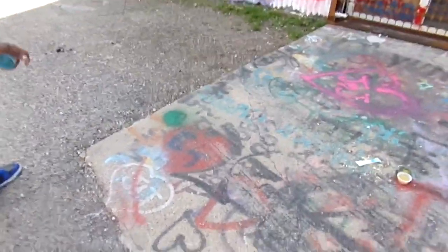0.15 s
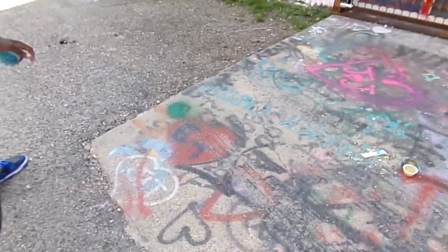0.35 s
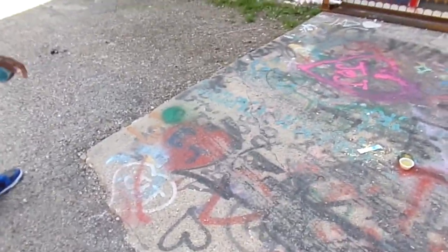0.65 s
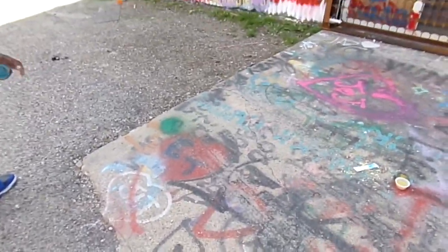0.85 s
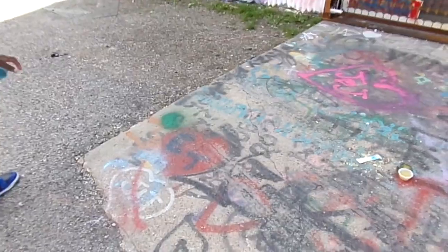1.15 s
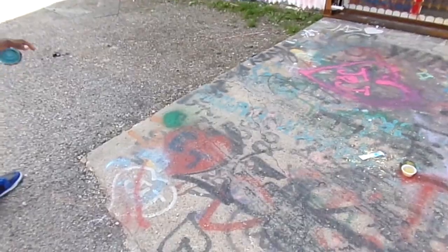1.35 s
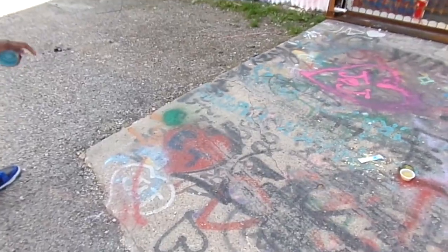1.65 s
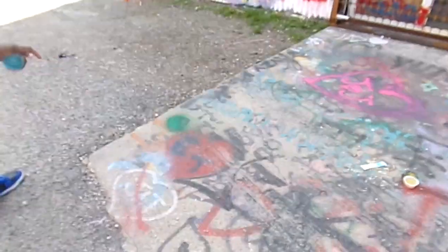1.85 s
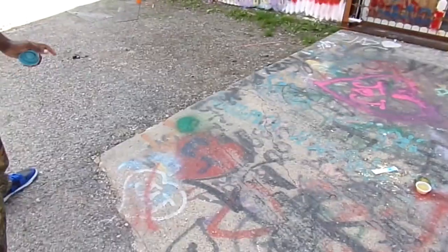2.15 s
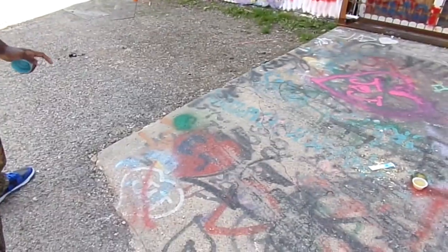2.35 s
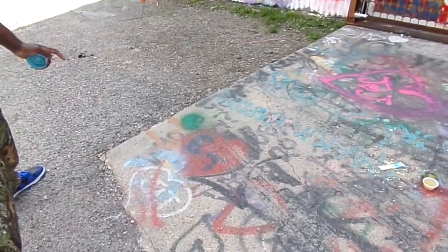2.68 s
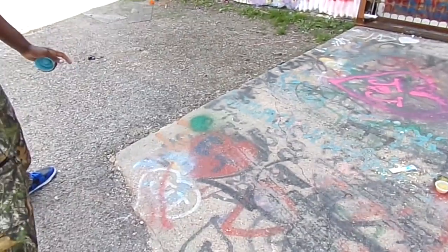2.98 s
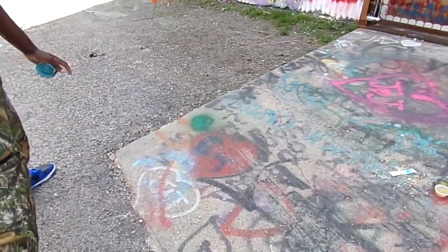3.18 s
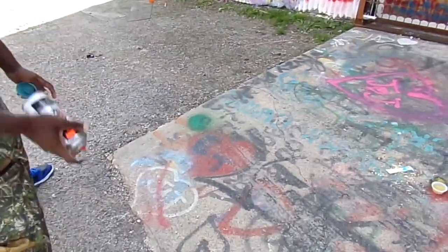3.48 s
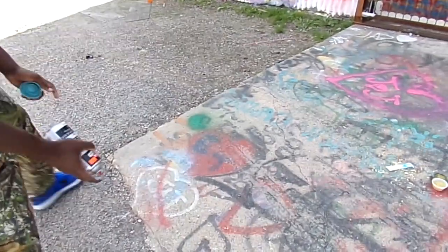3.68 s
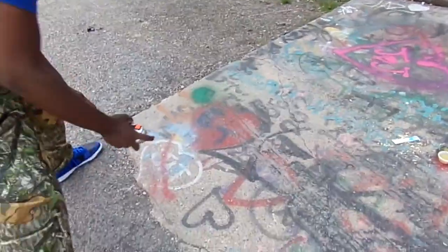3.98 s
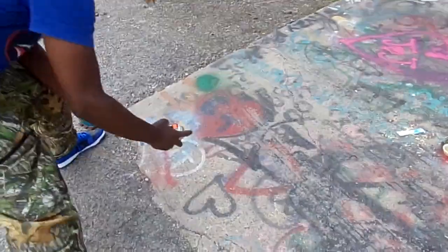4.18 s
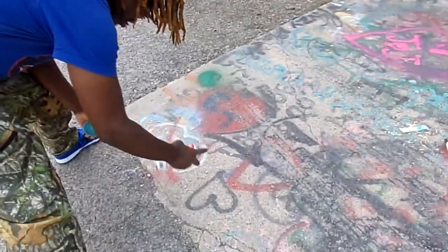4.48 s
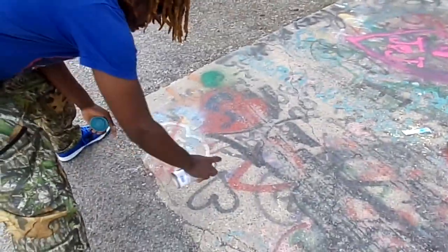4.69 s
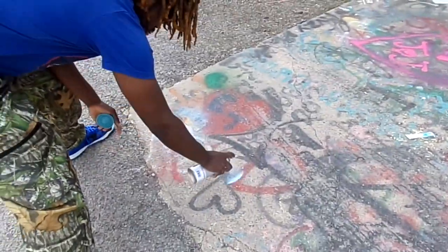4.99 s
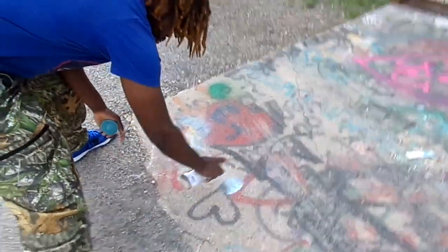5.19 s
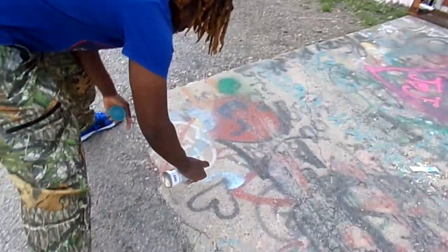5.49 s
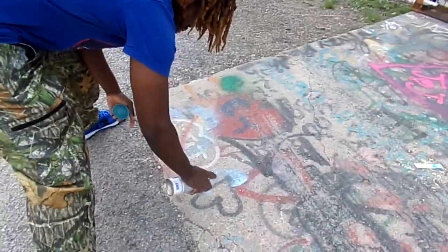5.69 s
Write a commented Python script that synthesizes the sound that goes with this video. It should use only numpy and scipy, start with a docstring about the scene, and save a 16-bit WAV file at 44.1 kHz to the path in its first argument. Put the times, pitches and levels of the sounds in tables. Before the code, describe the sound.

Loud, bright rattling of a ball in a metal aerosol can eases off, followed by brief spraying and small handling bumps on the microphone.

```python
"""Hard metallic knocks rattle outdoors, nearly four strokes a second: a spray paint can is shaken.
Each knock of the mixing ball runs through the thin steel wall as a falling chirp; ground and walls throw it back.
Between the knocks the ball ticks and skitters as hard as the arm moves, and a few soft steps land.
Then the can is lowered and hisses: shaped noise, combed by its echo off the pavement.
Twice a finger rubs on the camera, a far town murmurs, and the loudest knocks overload the small microphone."""
import sys
import numpy as np
from scipy import signal
from scipy.fft import rfft, irfft
from scipy.io import wavfile
from scipy.ndimage import map_coordinates

SR = 44100
rng = np.random.default_rng(int(sys.argv[2]) if len(sys.argv) > 2 else 0)


def dump(signal):
    """Clip the signal to [-1, 1] and save it as 16-bit WAV at the path in sys.argv[1]."""
    limited = np.clip(np.atleast_2d(signal).T, -1, 1)
    pcm = np.round(limited * 32767).astype(np.int16)
    wavfile.write(sys.argv[1], SR, pcm)


N = 257491  # length in samples
SIZE = 4096  # samples in one short pulse
HZ = np.fft.rfftfreq(SIZE, 1 / SR)  # frequencies of a pulse's spectrum


def amp(db):
    """Turns decibels into gain."""
    return 10 ** (np.asarray(db) / 20)


def unit(x):
    """Scales a sound to rms 1."""
    return x / np.sqrt(np.mean(x ** 2) + 1e-20)


def colour(points, hz):
    """Gain at the given frequencies, drawn through (Hz, dB) points."""
    point_hz, point_db = np.transpose(points)
    return amp(np.interp(np.log(hz + 1), np.log(point_hz), point_db))


def curve(rows, axis=1):
    """One column of a time table, read at every sample."""
    rows = np.asarray(rows)
    return np.interp(np.arange(N) / SR, rows[:, 0], rows[:, axis])


def shaped(x, points):
    """Gives a sound a spectrum, at rms 1."""
    gain = colour(points, np.fft.rfftfreq(N, 1 / SR))
    return unit(irfft(rfft(x) * gain, N))


def wander(per_s):
    """Random curve: normal draws, per_s of them each second, joined by straight lines."""
    knots = rng.standard_normal(int(N / SR * per_s) + 2)
    return np.interp(np.arange(N) / SR * per_s, np.arange(len(knots)), knots)


def grains(per_s, spread_db):
    """Random clicks of either sign, mostly small and a few large."""
    happens = rng.random(N) < per_s / SR
    sign = rng.choice([-1, 1], N)
    return happens * sign * amp(spread_db * np.minimum(rng.exponential(1, N), 3))


def add(mix, s, spectrum):
    """Lays the pulse with this spectrum into the mix at time s."""
    lead = SIZE // 8  # room for what arrives before time zero
    pulse = np.roll(irfft(spectrum), lead)
    start = round(s * SR) - lead
    part = mix[max(start, 0):][:SIZE]
    part += pulse[:len(part)]


def late(ms):
    """Spectrum of a delay."""
    return np.exp(-2j * np.pi * HZ * ms / 1000)


def bending(travel_ms):
    """Bending waves speed up as the root of frequency, so treble arrives first; 4 kHz marks time zero."""
    return np.exp(-2j * np.pi * travel_ms / 1000 * (2 * np.sqrt(1000 * HZ) - HZ / 2))


# the ball strikes the can, a hard blow and its bounces at each turn of the arm:
# start_s, level_db, body_db and crack_db (both against that level), travel_ms (of a 1 kHz bending wave)
BALL_KNOCKS = [(0.0284, -10.5, -5.5, -7, 6.3), (.0404, -8, -3.5, -9.5, 3.14),
               (0.0766, -13, -6.5, -7.5, 5.1), (.0861, -22.5, 4, -10, 3.7), (0.1322, -21, 0, -6, 7),
               (.161, -26.5, 9, -21, 5.7), (0.197, -33, 7.5, -15, 6.5), (0.2692, -24, -8, -15, 6.5),
               (0.2874, -5, -9, -6, 5.5), (0.304, -18, -7, -1, 4.3), (0.3185, -26.5, 12, -21, 4.4),
               (0.3838, -18.5, 5.5, -16, 4.3), (.408, -10.5, -5.5, -19, 6), (.439, -19.5, 3, -10, 8),
               (0.5385, -4.5, -11, -9, 7), (0.5516, -9, -4, -4.5, 6.2), (0.563, -13.5, -9, -10, 4.5),
               (.571, -9, -11, -16, 6.1), (0.5976, -13, -6, -10.5, 5.8), (0.6534, -19, 4, -2, 5.5),
               (.7334, -28.5, 2.5, -9, 5.6), (0.754, -25.5, 4, -23, 4.4), (.769, -25.5, 3.5, -27, 5.3),
               (0.8116, -7, -7, -18, 7.7), (.8156, -1, -11.5, -13.5, 4.85), (0.9409, -13.5, 0, -10.5, 4.1),
               (.973, -17, -1, -9, 4.2), (0.998, -20.5, 7, -14, 4.3), (1.0724, -8.5, -6, -6.5, 5.3),
               (1.0899, -9.5, -4.5, -12, 5.8), (1.1034, -9.5, -14, -11, 4.5), (1.1882, -20, 9, -4, 6),
               (1.251, -25.5, 5, -9, 3.9), (1.3384, -29, 4, -12, 4.4), (1.3654, -15.5, 1, -7.5, 5),
               (1.3959, -15.5, -6, -5.5, 6.2), (1.4822, -11.5, -0.5, -22.5, 6),
               (1.5176, -22.5, 1.5, -10, 5.5), (1.601, -2.5, -12, -8.5, 5.6),
               (1.6179, -12, -4.5, -0.5, 7.5), (1.6406, -34, 12, -11, 2.5), (1.6612, -24.5, 5.5, 5.5, 6),
               (1.671, -20.5, -3.5, -1.5, 5.1), (1.7326, -19.5, 4.5, 3.5, 5.2), (1.8857, -31, 10, -4, 5.4),
               (1.9002, -18.5, 4.5, -1.5, 5.1), (1.9162, -18.5, -3, -7, 6.2), (2.0101, -16, 3.5, -11, 6.5),
               (2.0397, -30, 4, -7, 5.1), (2.1127, -32, 4, -10, 7), (2.1498, -19.5, 5.5, 0, 6.1),
               (2.1664, -13, -8.5, -1, 5.8), (2.1741, -13, -4.5, -23, 6.5), (2.192, -13, -10, -9, 6.5),
               (2.2506, -19, 5, 0, 5), (2.3291, -23, 0, -10, 3.8), (2.3426, -31, 5, -2, 5.5),
               (2.3904, -27.5, 7, -9, 6.8), (2.3989, -4, -11, -11, 5.8), (2.4102, -11, -1, -13, 6),
               (2.4545, -27, 2.5, 4.5, 3.9), (2.5308, -15, -5.5, -11.5, 8), (2.5613, -28, 8, -6, 5.3),
               (2.59, -32, 2, 2, 5.3), (2.6713, -7.5, -6, -13, 6.2), (2.6734, -4.5, -10.5, -12, 4.9),
               (2.7453, -35, 18, -1, 4.4), (2.7959, -17, -4, -7.5, 2.5), (2.869, -33.5, 3, -4, 2.5),
               (2.9502, -6.5, -12, -10, 4.8), (2.9597, -12, -12, -26, 7), (3.0881, -18.5, 1, -12, 4.2),
               (3.2151, -11.5, -13.5, 2, 4.8), (3.275, -18.5, -12, -5.5, 3.65), (3.319, -19, -5.5, -9, 3.5),
               (3.4234, -34.5, -8, -7, 4.5), (3.4718, -28.5, -10, -2.5, 4.3), (3.56, -31.5, -4, -8, 4.8),
               (3.625, -35, -17, -7, 4.5), (3.7006, -31.5, 12.5, -4, 5.5), (3.7239, -32.5, 8.5, -4, 4.1),
               (3.8125, -34.5, 11.5, -10, 5), (4.1674, -35, 8, -4.5, 2.9), (4.2228, -28, -1, -12, 4.5),
               (4.348, -37.5, 11, -1, 4), (4.4417, -47, 5, -3, 4.54), (4.5158, -41, 0, -10, 6)]
# colour of the can's wall when knocked: pitch_hz, level_db
CAN_WALL = [(150, -26), (450, -26.5), (700, -18), (1000, -10), (1400, -6.5), (2000, 1.5), (2700, 4),
            (3300, 3), (4000, 4), (5000, 0.5), (7000, -1), (9000, -9.5), (10500, -25), (15500, -20.5)]
# what rings on in the hand-held can: pitch_hz, level_db (relative), t60_s (time to fall 60 dB)
CAN_RINGS = [(2022, -26.5, 0.033), (3730, -43, 0.012), (5090, -30, 0.032)]
# where a knock's level, body and crack are weighed: from_hz, to_hz
KNOCK_BANDS = [(2600, 5500), (700, 2600), (5500, 11000)]
# how much colour and ring differ from one struck spot to the next
SPOT_DB, RING_SPREAD_DB = 3.8, 3.5


def knocks(level_db=0., long_way_db=-9, long_way_ms=1.522, ground_db=-11, ground_ms=5.3, swing_ms=0.99,
           hollow=0.12, edge_share=0.19, top_share=0.29, top_db=0.0, force_share=0.017,
           ring_detune=.015, ground_spread_db=0.0):
    """Each contact: a chirp, another the long way round the can, a short ring and a bounce off the ground."""
    out, t = np.zeros(N), np.arange(SIZE) / SR
    contacts = BALL_KNOCKS + touches()
    for (s, db, body_db, crack_db, travel_ms), luck in zip(contacts, rng.standard_normal((230, 32))):
        round_can = amp(long_way_db) * bending(travel_ms * 0.283)
        round_can = round_can * late(long_way_ms * (1 + 0.2045 * luck[0]))

        ring = np.zeros(SIZE)
        for (hz, ring_db, t60), chance in zip(CAN_RINGS, luck[5:]):
            fade = amp(ring_db + RING_SPREAD_DB * np.tanh(chance) - 60 * t / t60)
            ring += fade * np.cos(2 * np.pi * hz * (1 + ring_detune * luck[4]) * t)

        # the spot that is struck favours some bands over others
        spot_places = np.linspace(0, np.sqrt(SR / 2), len(luck) - 2)
        spot = amp(SPOT_DB * np.interp(np.sqrt(HZ), spot_places, luck[2:]))
        sound = colour(CAN_WALL, HZ) * spot * bending(travel_ms)
        sound = sound * (1 + round_can) * (1 + 0.15 * rfft(ring))

        # soft contacts favour the hollow body, hard ones the crack; levels are taken over 3 ms
        middle, body, crack = (
            10 * np.log10(np.sum(abs(sound[(HZ > lo) & (HZ < hi)]) ** 2) / (33 * SIZE))
            for lo, hi in KNOCK_BANDS)
        low = body_db - body + middle
        high = crack_db - crack + middle
        top = top_db + top_share * high + force_share * (db + 14)  # harder knocks are a little brighter
        tilt = [(1100, low * (1 + hollow)), (2200, low), (3400, 0),
                (4800, edge_share * high), (6300, high), (10000, top)]
        sound *= amp(db + level_db - middle) * colour(tilt, HZ)

        bounce = amp(ground_db + ground_spread_db * np.tanh(luck[2]) + 0.14 * body_db)
        bounce = bounce * late(ground_ms + swing_ms * luck[1]) / (1 + (HZ / 9000) ** 2)
        add(out, s, sound * (1 + bounce))
    return out


# travel time of a light touch's 1 kHz bending wave, and the most it strays either way
TRAVEL_MS, TRAVEL_SPREAD_MS = 4.8, 1.47
# light touches, with their level at 0 dB effort and the most it strays either way
TOUCHES_PER_S, TOUCH_DB, TOUCH_SPREAD_DB = 24, -37.5, 2.5
# the lighter a touch is, the duller it sounds: body dB gained per dB lost
TOUCH_BODY_DB, TOUCH_CRACK_DB, DULLING = 8.5, -13.5, .5


def touches():
    """Light random contacts until the jet starts, as rows like those of the knocks."""
    firm_db, rows = contact_db(), []
    for k, (when, force, edge, spot) in enumerate(rng.uniform(-1, 1, (130, 4))):
        s = (k + 1 + when) / TOUCHES_PER_S
        if s < JET_START_S:
            harder_db = TOUCH_SPREAD_DB * force
            level_db = TOUCH_DB + firm_db[int(s * SR)] + harder_db
            body_db = TOUCH_BODY_DB - DULLING * harder_db
            crack_db = TOUCH_CRACK_DB + 4 * edge
            rows.append((s, level_db, body_db, crack_db, TRAVEL_MS + TRAVEL_SPREAD_MS * spot))
    return rows


# how hard the can is moved, as it is shaken, eased off, lowered and held still: start_s, level_db
ARM_EFFORT = [(0, -1), (.7, 1.5), (2.5, -1), (3.1, -4.5), (3.6, -5), (3.9, -11), (4.5, -17.5), (4.75, -24)]
# before each blow louder than HARD_DB the ball flies free and the rattle hushes
HARD_DB, FLIGHT_S, FLIGHT_DB = -8, 0.029, -3


def contact_db():
    """How firmly the ball rides the wall: follows the arm's effort, except in free flight."""
    t = np.arange(N) / SR
    blows = np.array([s for s, db, *_ in BALL_KNOCKS if db > HARD_DB] + [np.inf])
    wait = blows[np.searchsorted(blows, t)] - t  # time until the next hard blow
    return curve(ARM_EFFORT) + FLIGHT_DB * np.exp(-(wait / FLIGHT_S) ** 2)


# places on the wall that the ball grazes: travel_ms, treble_corner_hz, favoured_hz, level_db
GRAZED_PLACES = [(5., 2550, 1440, -1.5), (6., 2900, 2130, -0.5), (5., 4700, 2800, 2),
                 (6., 16000, 6050, -3.5), (7., 7700, 3100, -3)]
# skitter along the wall at 0 dB effort, before the wall colours it
SKITTER_DB = -45.5
# after a knock the ball chatters; CHATTER_GROWTH is dB per dB of knock, up to HARD_DB
CHATTER_DB, CHATTER_GROWTH = -20, 1.18


def skitter(per_s=30, spread_db=4.0, slosh_db=-17, chatter_s=0.014, chatter_per_s=110, wait_s=0.008,
            favour=1.1, favour_width=.12):
    """Glancing touches, a dying chatter after each knock, and churning paint, all through the same wall."""
    out, kicks = np.zeros(N), np.zeros(N)
    firm = amp(SKITTER_DB + contact_db())
    for s, db, *_ in BALL_KNOCKS:
        kicks[round((s + wait_s) * SR)] = amp(CHATTER_DB + CHATTER_GROWTH * min(db, HARD_DB))
    # each kick dies away exponentially
    chatter = signal.lfilter([1], [1, -np.exp(-1 / (chatter_s * SR))], kicks)
    for travel_ms, soft_hz, band_hz, place_db in GRAZED_PLACES:
        glances = unit(grains(per_s, spread_db))
        slosh = amp(slosh_db) * rng.standard_normal(N)
        grazes = firm * amp(place_db) * (glances + slosh)
        grazes += chatter * unit(grains(chatter_per_s, 0.28))

        favoured = 1 + favour / (1 + ((HZ / band_hz - 1) / favour_width) ** 2)
        local = favoured / (1 + (HZ / soft_hz) ** 4)
        chirp = irfft(colour(CAN_WALL, HZ) * local * bending(travel_ms))
        chirp = np.roll(chirp / np.linalg.norm(chirp), SIZE // 2)
        out += signal.oaconvolve(grazes, chirp, "same") / 2
    return out


def yard(x, wet_db=-18, first_s=0.012, t60=0.15, far_db=-31, far_s=0.068, far_t60=0.15, dull_hz=9000,
         half_turns_per_s=3.74 * 0.755, count=3):
    """Scatter from things nearby and faint echoes from farther walls; the paths change as the can swings."""
    t, out = np.arange(SR // 2) / SR, np.zeros(N)
    for k in range(count):
        # sparse random reflections, 1200 a second
        near, far = rng.standard_normal((2, len(t))) * (rng.random((2, len(t))) < 1200 / SR)
        near = near * (t > first_s) * amp(-60 * t / t60)
        far = far * (t > far_s) * amp(-60 * t / far_t60)
        tail = amp(wet_db) * near / np.linalg.norm(near) + amp(far_db) * far / np.linalg.norm(far)
        # the sets of paths fade in and out by turns
        turn = np.arange(N) / SR * half_turns_per_s + k / count
        share = np.sqrt(2 / count) * np.cos(np.pi * turn)
        out += signal.fftconvolve(x * share, tail)[:N]
    band = signal.butter(1, [1800, min(dull_hz, 20000)], "bandpass", fs=SR)
    return signal.lfilter(*band, out)


# colour of the jet's hiss: pitch_hz, level_db (per Hz)
JET_HISS = [(600, -36), (1800, -28), (2800, -5), (3300, -0.5), (4000, -3), (4800, -0.5), (6000, -6),
            (7100, -5), (8900, -9.5), (10300, -24), (12000, -22), (14000, -13), (15600, -14), (16000, -56)]
# lag of the jet's echo off the pavement as the nozzle moves: start_s, lag_ms
JET_ECHO_LAG = [(4.73, 0.6), (4.93, 0.53), (5.12, 0.5), (5.3, 0.54), (5.45, 0.48), (5.6, 0.51),
                (5.84, 0.58)]
# the valve opens fast; the hiss fades as the hand moves away
JET_START_S, JET_ATTACK_S, JET_DB, JET_FADE_DB_PER_S = 4.727, 0.0073, -45, 4.5


def jet(echo=0.49, flutter_db=1.3, echo_top_hz=10500):
    """Nozzle hiss, combed by its own echo off the pavement just below, which returns inverted."""
    hiss, at = shaped(rng.standard_normal(N), JET_HISS), np.arange(N)
    mirrored = map_coordinates(hiss, [at - curve(JET_ECHO_LAG) * SR / 1000], order=3)
    # rough pavement scatters the top
    mirrored = signal.filtfilt(*signal.butter(2, min(echo_top_hz, 20000), fs=SR), mirrored)
    age = np.maximum(at / SR - JET_START_S, 0)
    opening = np.minimum(age / JET_ATTACK_S, 1)
    level = amp(JET_DB - JET_FADE_DB_PER_S * age + flutter_db * wander(40))
    return opening * level * unit(hiss - echo * mirrored)


# a finger slides on the camera:
# start_s, length_s, attack_s, level_db, low_part_db (its weight), spot_hz (resonance of the pressed spot)
FINGER_RUBS = [(4.993, 0.074, 0.019, -20, 8.5, 2350), (5.507, 0.019, 0.0052, -21, 6.5, 1070),
               (5.532, 0.014, .005, -39, 18, 1080)]
# the finger catches: start_s, level_db, low_part_db (its weight)
FINGER_CATCHES = [(4.946, -28, 30), (4.953, -33, 24), (5.04, -24.5, 9), (5.059, -30, 20),
                  (5.074, -23.5, -9), (5.275, -35, -5), (5.512, -25, -4), (5.5383, -26, 16),
                  (5.547, -31, -10), (5.574, -37, -13)]
# colour of the camera's case: pitch_hz, level_db
CAMERA_CASE = [(80, -30), (190, -4), (330, 1), (520, -3), (1000, -3.5), (1700, -2.5), (2450, 6), (3000, 2),
               (3600, -5), (5000, -13), (8000, -17.5), (15000, -52)]
# a rub eases while it lasts, then lets go
RUB_EASE_DB_PER_S, RUB_RELEASE_S = 102, 0.0042
# a lighter brush lingers after the rub, against the rub's level
BRUSH_DB, BRUSH_S = -15, .06


def finger(slips_per_s=1800, spread_db=2.5, split_hz=1600, spot_gain=1., spot_width_hz=400, travel_ms=1.42):
    """Dense tiny slips and a few hard catches shake the camera's case."""
    slips = shaped(grains(slips_per_s, spread_db), CAMERA_CASE)
    low = signal.filtfilt(*signal.butter(2, split_hz, fs=SR), slips)
    out = np.zeros(N)
    for start, length, attack, db, low_db, spot_hz in FINGER_RUBS:
        age = np.maximum(np.arange(N) / SR - start, 0)
        after = np.maximum(age - length, 0)
        grip = np.minimum(age / attack, 1) * amp(db - RUB_EASE_DB_PER_S * np.minimum(age, length))
        release = np.maximum(np.exp(-after / RUB_RELEASE_S), amp(BRUSH_DB) * np.exp(-after / BRUSH_S))
        slide = slips + (amp(low_db) - 1) * low
        spot = signal.lfilter(*signal.iirpeak(spot_hz, spot_hz / spot_width_hz, SR), slide)
        out += grip * release * unit(slide + spot_gain * spot)
    for s, db, low_db in FINGER_CATCHES:
        weight = amp(low_db / (1 + (HZ / 900) ** 3))
        sound = colour(CAMERA_CASE, HZ) * weight * bending(travel_ms)
        # level over 3 ms
        add(out, s, amp(db) * sound * np.sqrt(SIZE * 66 / np.sum(abs(sound) ** 2)))
    return out


# soft soles land on the asphalt: start_s, level_db, length_s
FOOTSTEPS = [(3.427, -38, 0.013), (3.686, -40.5, 0.023), (3.768, -38, 0.0095), (4.087, -43.5, 0.013)]
# colour of a sole: pitch_hz, level_db (per Hz)
SOLE_COLOUR = [(60, -17), (130, 2), (210, 11), (400, 1), (700, 0.5), (1400, -5), (3000, -7), (9000, -33)]


def steps():
    """Dull swells of noise as the painter steps forward."""
    t = np.arange(N) / SR
    press = sum(amp(db) * np.exp(-((t - s) / length) ** 2) for s, db, length in FOOTSTEPS)
    return press * shaped(rng.standard_normal(N), SOLE_COLOUR)


# colour of the distant town: pitch_hz, level_db (per Hz)
TOWN_COLOUR = [(20, -41.5), (50, -11.5), (100, 2), (135, -1), (200, 3.5), (290, 1.5), (520, -12),
               (620, -5.5), (720, -9), (1200, -12), (2400, -11), (7000, -22.5), (10500, -41), (15500, -32)]
TOWN_DB = -46.5


def town(swell_db=-1.77):
    """A steady far murmur of traffic, shaped noise that swells a little."""
    level = amp(TOWN_DB + swell_db * wander(8.4))
    return level * shaped(rng.standard_normal(N), TOWN_COLOUR)


def scene():
    """The can in the open yard, the steps, the jet, the finger and the town."""
    can = knocks() + skitter()
    return (can + yard(can) + steps() + jet() + finger() + town())[None]


# narrow bands that the microphone's sound channel swallows: pitch_hz, width_hz
CHANNEL_NOTCHES = [(3680, 195), (4380, 270), (8040, 570), (11720, 400)]
EDGE_HZ = 16050  # nothing much passes above this


def record(dry, peak_hz=4040, peak_width_hz=450, peak_gain=0.92, ceiling=0.95):
    """The microphone's channel adds one resonance and notches, then overload clips and a low-pass trims."""
    x = dry + peak_gain * signal.lfilter(*signal.iirpeak(peak_hz, peak_hz / peak_width_hz, SR), dry)
    for hz, width in CHANNEL_NOTCHES:
        x = signal.lfilter(*signal.iirnotch(hz, hz / width, SR), x)
    x = np.clip(x, -ceiling, ceiling)
    low_pass = signal.firwin(511, EDGE_HZ, window=("kaiser", 9), fs=SR)
    return signal.oaconvolve(x, low_pass[None], "same")


dry = scene()
out = record(dry)
dump(out)
```